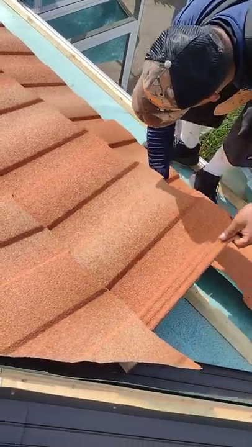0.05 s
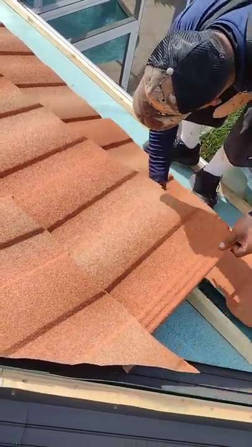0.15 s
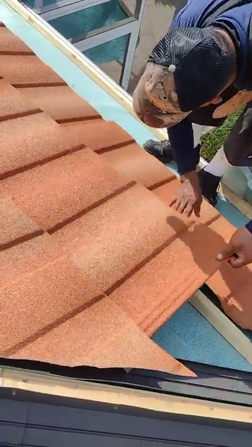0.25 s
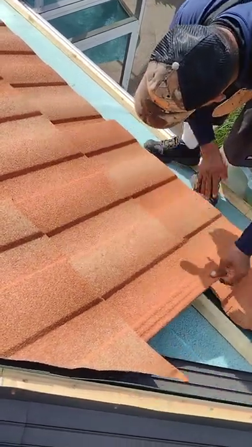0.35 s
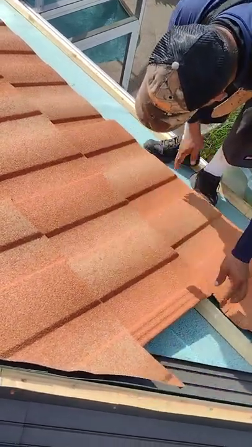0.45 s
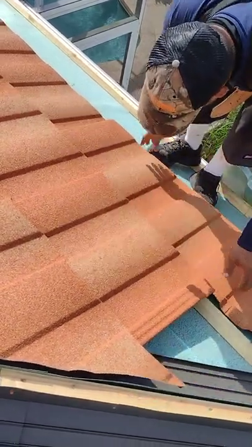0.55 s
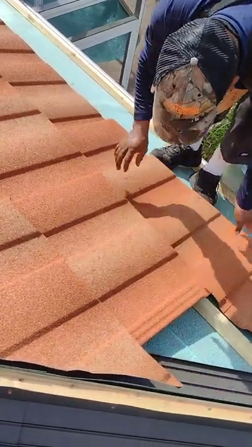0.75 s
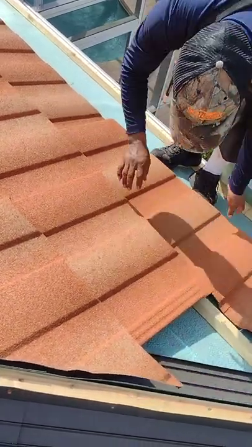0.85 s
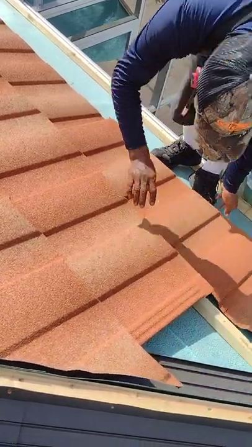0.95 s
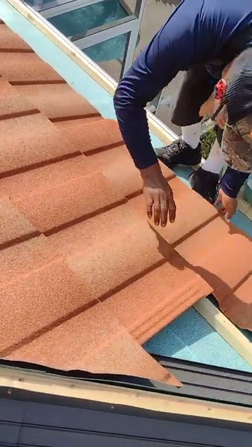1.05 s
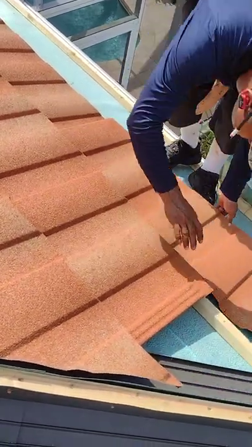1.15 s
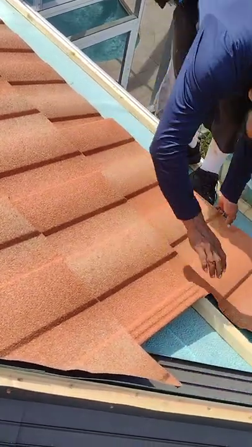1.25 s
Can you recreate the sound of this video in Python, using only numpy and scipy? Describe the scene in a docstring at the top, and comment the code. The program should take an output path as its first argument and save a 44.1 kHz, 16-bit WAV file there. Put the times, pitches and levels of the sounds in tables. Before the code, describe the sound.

A metal roof panel is shoved over its neighbours, scraping grittily and knocking as the thin sheet flexes. It drops flat with a heavy slap, rocks briefly and settles, heard close by outdoors.

```python
"""Outdoors on a roof, close by, a stone-coated steel panel is shoved over its neighbours and dropped flat.
The thin sheet booms as it bends and knocks as it judders along. Its gritty face scrapes, and its edge
snaps over the stone granules and squeaks where it catches. It lands with a heavy slap, rocks a few
times and settles, leaving a faint outdoor background."""
import sys
import numpy as np
from scipy import signal
from scipy.fft import rfft, irfft
from scipy.io import wavfile

SR = 44100
rng = np.random.default_rng(int(sys.argv[2]) if len(sys.argv) > 2 else 0)


def transcribe(u):
    """Save the signal u as a 16-bit wav file named by the first command-line argument.

    u: samples, shape (n,) or (channels, n), limited to [-1, 1]; the rate is SR.
    q: integer samples, one column per channel.
    """
    v = np.clip(np.atleast_2d(u).T, -1, 1)
    q = np.round(v * 32767).astype(np.int16)
    wavfile.write(sys.argv[1], SR, q)


N = 57330  # 1.3 seconds


def amp(db):
    """Turns decibels into a number to multiply a sound by."""
    return 10 ** (np.asarray(db) / 20)


def unit(x):
    """Scales a sound so that its average power is 1."""
    return x / np.sqrt(np.mean(x ** 2) + 1e-20)


def fade(t, fade_s):
    """A curve that dies away by 60 dB every fade_s seconds."""
    return np.exp(-np.log(1000) * t / fade_s)


def read(points, hz):
    """Looks up a value between the rows of a table, with pitch spaced in octaves."""
    pitches, values = np.transpose(points)
    return np.interp(np.log(hz + 1), np.log(pitches + 1), values)


def add(mix, start_s, sound):
    """Mixes a stereo sound in at its start time."""
    part = mix[:, max(round(start_s * SR), 0):][:, :sound.shape[1]]
    part += sound[:, :part.shape[1]]


def sides(hz):
    """How strongly each pitch reaches the left and the right."""
    # Which way each pitch leans: pitch_hz, left_minus_right_db
    balance = [(100, -0.5), (330, -1), (600, -5.5), (1000, 7.5), (1500, 2), (2200, 1), (3200, -4),
               (5000, 3), (12000, 3.5)]
    return amp(np.array([[.5], [-.5]]) * read(balance, hz))


def noise(colour, size):
    """Stereo noise, alike on both sides in the bass, wide in the treble; colour gives level by pitch."""
    # How alike left and right are: pitch_hz, likeness (1 = the same)
    likeness = [(100, 0.78), (250, 1), (500, 0.72), (1000, 0.13), (1800, 0.065), (16000, 0.16)]
    hz = np.fft.rfftfreq(size, 1 / SR)
    a, b = np.exp(2j * np.pi * rng.random((2, len(hz))))
    same = np.clip(read(likeness, hz), -1, 1)
    mid, side = np.sqrt(1 + same) * a, np.sqrt(1 - same) * b
    spectrum = np.array([mid + side, mid - side]) * sides(hz) * amp(read(colour, hz))
    return unit(irfft(spectrum, size))


def flexes():
    """The thin sheet bends, booming or groaning on one note that swells, sags a little and fades."""
    # Bends of the sheet: start_s, length_s, level_db, pitch_hz
    bends = [(0, 0.087, -35, 83), (0.038, 0.11, -37.5, 128.6), (0.092, 0.11, -37.5, 98.3),
             (0.156, 0.064, -30.5, 93.6), (0.219, 0.13, -20.5, 100.9), (0.286, 0.17, -22.5, 321.2),
             (.256, .024, -22, 191), (0.334, 0.15, -23, 91.8), (0.415, 0.11, -27.5, 456),
             (.225, 0.054, -21.5, 141), (0.447, 0.14, -25, 96.5), (0.564, .038, -12.5, 119.4),
             (0.6, 0.12, -30.5, 105.5), (0.622, 0.026, -21.5, 409), (.696, 0.092, -26.5, 112.7),
             (0.78, 0.038, -35, 95), (0.85, 0.071, -41, 111.6)]
    sag, overtone_db = 0.046, -24  # sag is a share of the pitch
    out = np.zeros((2, N))
    for start_s, length_s, level_db, pitch_hz in bends:
        progress = np.arange(0, length_s, 1 / SR) / length_s
        phase = 2 * np.pi * np.cumsum(pitch_hz * (1 + sag * (.5 - progress))) / SR
        note = np.sin(phase) + amp(overtone_db) * np.sin(2 * phase)
        swell = np.sin(np.pi * progress ** 0.4) ** 2  # quick rise, slow fall
        add(out, start_s, sides(pitch_hz) * amp(level_db + 2.5) * swell * note)
    return out


def grains(colour, per_s, fade_s):
    """Granules catch and slip at random, each ringing one of three patches of the sheet."""
    patches, spread_db, rise_s = 3, 5.5, 0.00026
    t, out = np.arange(4096) / SR, np.zeros((2, N))
    for _ in range(patches):
        slips = (rng.random(N) < per_s / patches / SR) * rng.choice([-1, 1], N)
        slips = slips * amp(spread_db * np.minimum(rng.exponential(1, N), 3))
        ring = noise(colour, len(t)) * (1 - np.exp(-t / rise_s)) * fade(t, fade_s)
        out += signal.oaconvolve(slips[None], ring, axes=1)[:, :N]
    return unit(out)


def scrape():
    """The gritty face of the panel drags while its edge slides on the granules with a thin rasp."""
    # How hard the face drags: time_s, level_db
    drag_levels = [(0, -44), (.09, -44.5), (0.124, -37), (.165, -33.5), (.184, -57.5), (.207, -24.5),
                   (0.241, -23.5), (0.256, -32), (.32, -25), (.38, -28.5), (.4, -36), (0.442, -26),
                   (0.479, -35.5), (0.528, -35), (.59, -38), (0.662, -53), (.73, -44), (.9, -61)]
    # Tone of the dragging face: pitch_hz, level_db
    drag_colour = [(60, -22.5), (110, 10.5), (330, 16.5), (580, 10), (800, 15.5), (1050, 5.5), (1600, 3.5),
                   (2800, 1.5), (3600, -11.5), (7000, -21), (12000, -37)]
    # How loud the edge rasps: time_s, level_db
    rasp_levels = [(0, -45.5), (.09, -72), (.13, -41), (.165, -51), (.185, -75), (.215, -41), (.255, -45),
                   (.33, -46.5), (.4, -44.5), (.53, -38.5), (.543, -57), (.556, -26.5), (.585, -41.5),
                   (.68, -52.5), (.71, -67)]
    # Tone of the rasping edge: pitch_hz, level_db
    rasp_colour = [(50, -29), (1200, 4.5), (2000, -0.5), (2400, 4.5), (2950, 5.5), (3500, -12), (6000, -24),
                   (16000, -60)]
    t = np.arange(N) / SR
    drag_db = np.interp(t, *np.transpose(drag_levels)) - 1.5
    rasp_db = np.interp(t, *np.transpose(rasp_levels))
    drag = grains(drag_colour, per_s=1400, fade_s=0.045) * amp(drag_db)
    rasp = grains(rasp_colour, per_s=1800, fade_s=0.07) * amp(rasp_db)
    return drag + rasp


def background():
    """A faint, steady outdoor rumble with a trace of hiss."""
    # Tone of the outdoor air: pitch_hz, level_db
    air_colour = [(25, 2), (50, -0.5), (90, 1.5), (150, -7.5), (230, -6), (400, -19), (650, -55),
                  (1700, -25), (2500, -40.5), (3200, -27.5), (3900, -32.5), (15500, -44.5)]
    return amp(-49.5) * noise(air_colour, N)


def bending_wave(hz, lag_s):
    """A ripple in steel carries treble faster than bass; lag_s is its delay at reference_hz."""
    reference_hz = 401.6
    return np.exp(-4j * np.pi * lag_s * np.sqrt(hz * reference_hz))


def knock(body_db, clash_db, ring_scale):
    """One blow sends a ripple through the sheet and sets off its own notes and a short, noisy clash."""
    # Tone of the ripple: pitch_hz, level_db
    ripple_colour = [(50, -25), (110, 4), (200, 3.5), (400, -8), (1000, 7), (1450, 12.5), (2600, -15),
                     (4000, -26), (9000, -73)]
    # Notes the free sheet rings at: pitch_hz, level_db, fade_s
    sheet_notes = [(134, 0.5, 0.187), (151.8, -2, 0.45), (202.5, -7.5, 0.31), (248.4, -12, 0.34),
                   (309.6, -7.5, 0.21), (354.4, -2, 0.13), (455, -16, 0.36), (490, -24.5, 0.15),
                   (642, -13.5, 0.12), (718, -6, 0.076), (1219, -14.5, 0.33), (1284, -4, 0.12),
                   (2320, -10.5, 0.12), (2577, -8.5, 0.086), (2710, -14, 0.06)]
    # Tone of the clash, many ringing notes packed together: pitch_hz, level_db
    clash_colour = [(40, -62.5), (110, 1.5), (200, 1), (380, 6), (580, -5.5), (800, 3.5), (1020, -9),
                    (1650, 1), (1950, -4.5), (2800, -1), (3500, -22), (6500, -36), (10000, -51.5),
                    (16000, -65)]
    # How long the clash lasts in the free sheet: pitch_hz, fade_s
    clash_fades = [(100, 0.34), (400, 0.12), (1500, 0.055), (3000, 0.053), (10000, 0.018)]
    size, rise_cycles, contact_s = 2 ** 15, 0.22, 0.00077
    t, hz = np.arange(size) / SR, np.fft.rfftfreq(size, 1 / SR)
    # Strength of the blow, from bass boom through body to clash: pitch_hz, level_db
    force = [(119, body_db - 7), (275, body_db), (688, body_db), (1440, clash_db)]

    ripple = amp(read(ripple_colour, hz)) * bending_wave(hz, lag_s=0.00203)
    ripple = ripple / abs(irfft(ripple)).max() * amp(read(force, hz) + 7.5)
    out = irfft(ripple * sides(hz)) * (t < t[-1] / 2)

    for pitch_hz, level_db, fade_s in sheet_notes:
        rise = 1 - np.exp(-t * pitch_hz / rise_cycles)
        note = np.sin(2 * np.pi * pitch_hz * t) * rise * fade(t, fade_s * ring_scale)
        out += sides(pitch_hz) * amp(level_db + read(force, pitch_hz) - 1) * note

    clash = rfft(noise(clash_colour, size)) * amp(read(force, hz) + 0.5)
    for pitch_hz, fade_s in clash_fades:  # each band of pitches dies away at its own speed
        share = [(band_hz, float(band_hz == pitch_hz)) for band_hz, _ in clash_fades]
        band = irfft(clash * read(share, hz))
        rise = 1 - np.exp(-t / (contact_s + rise_cycles / pitch_hz))
        out += 2 * band * rise * fade(t, fade_s * ring_scale)
    return out


def knocks():
    """The panel knocks on the roof as it judders along, lands and rocks to rest."""
    # Blows on the roof: start_s, body_db, clash_db, ring_scale (1 = rings as long as the free sheet)
    blows = [(.001, -35, -46, 0.54), (.034, -33, -39.5, 0.84), (.108, -40, -37.5, 1.1),
             (.134, -32, -33, 0.41), (.152, -30.5, -31.5, 0.4), (.207, -28.5, -31, 1.3),
             (.229, -32.5, -50, 4), (.277, -16.5, -22, 0.81), (.305, -24, -28, 2.9), (.327, -20, -25, 0.77),
             (.344, -22.5, -29, 1.45), (.356, -20.5, -39, 1.33), (.373, -19.5, -27.5, 0.67),
             (.409, -29, -27, 0.4), (.42, -25, -28, 0.87), (.439, -22, -67, 0.93), (.457, -30.5, -32, 0.53),
             (0.495, -25.5, -33.5, .96), (0.526, -24, -29, 0.36), (0.549, -22.5, -29, 0.65),
             (.559, -20.5, -26.5, 0.75), (.57, -10.5, -62, 0.66), (.6, -20.5, -31.5, 0.38),
             (.624, -27, -35, 0.88), (.674, -30, -47, 1.22), (.744, -36, -48, 1.1),
             (.791, -52, -44.5, 0.57), (.877, -47, -60.5, 0.87)]
    out = np.zeros((2, N))
    for start_s, body_db, clash_db, ring_scale in blows:
        add(out, start_s, knock(body_db, clash_db, ring_scale))
    return out


def snaps():
    """The edge jumps over the granules with short, bright rasps, on the left."""
    # Jumps of the edge: start_s, level_db, low_edge_hz (the sound thins out below this pitch)
    jumps = [(0.1575, -42.5, 6540), (0.207, -40.5, 5500), (.223, -38, 3960), (0.3148, -29, 5900),
             (0.329, -21, 1210), (.4205, -26.5, 3430), (0.436, -38, 3880), (0.462, -47, 2000),
             (0.483, -40.5, 6040), (0.551, -35, 2490), (0.5714, -38, 5000), (0.611, -42.5, 2800),
             (0.622, -46, 2980)]
    hold_s, treble_db_per_octave, right_db = 0.004, -18, -12
    t, hz, out = np.arange(4096) / SR, np.fft.rfftfreq(4096, 1 / SR), np.zeros((2, N))
    burst = fade(np.maximum(t - hold_s, 0), fade_s=0.045)
    for start_s, level_db, low_edge_hz in jumps:
        treble_cut = amp(treble_db_per_octave * np.log2(1 + hz / low_edge_hz))
        bass_cut = hz ** 2 / (hz ** 2 + low_edge_hz ** 2)
        hiss = rng.standard_normal((2, len(t)))
        rasp = unit(irfft(rfft(hiss) * treble_cut * bass_cut))
        add(out, start_s, rasp * burst * amp(level_db - 2))
    return out * amp([[0], [right_db]])


def squeaks():
    """The edge catches, and a quick run of slips makes one tinny note of the metal sing briefly."""
    # Catches of the edge: start_s, length_s, level_db, pitch_hz
    catches = [(0.22, 0.019, -35, 2163), (0.273, 0.0079, -20.5, 1680), (0.31, 0.027, -36.5, 3400),
               (.42, 0.013, -35, 1345), (0.503, 0.038, -40.5, 2580), (0.547, 0.011, -30, 2390),
               (0.653, .012, -41, 2727)]
    t, out = np.arange(4096) / SR, np.zeros((2, N))
    for start_s, length_s, level_db, pitch_hz in catches:
        slips = rng.standard_normal((2, len(t))) * np.sin(np.pi * np.minimum(t / length_s, 1))
        ring = np.sin(2 * np.pi * pitch_hz * t) * np.sqrt(t) * fade(t, fade_s=0.019)
        squeak = signal.fftconvolve(slips, ring[None], axes=1)
        squeak *= np.sqrt(length_s * SR) / np.linalg.norm(squeak, axis=1, keepdims=True)
        add(out, start_s, sides(pitch_hz) * amp(level_db) * squeak)
    return out


def slaps():
    """The whole sheet hits the roof's support strips and is stilled at once: one ripple, no ringing."""
    # Flat hits: start_s, level_db, centre_hz
    hits = [(0.2772, -21, 380), (.558, -6.5, 230), (.5685, -6, 544), (.571, -10.5, 150)]
    width_octaves = 0.8
    hz, out = np.fft.rfftfreq(8192, 1 / SR), np.zeros((2, N))
    for start_s, level_db, centre_hz in hits:
        octaves_away = np.log2((hz + 1) / centre_hz)
        hump = np.exp(-.5 * (octaves_away / width_octaves) ** 2) / np.sqrt(hz + 1)
        ripple = hump * bending_wave(hz, lag_s=0.003097)
        slap = irfft(ripple * sides(hz))[:, :len(hz)] / abs(irfft(ripple)).max()
        add(out, start_s, amp(level_db) * slap)
    return out


def echo(sound):
    """The roof deck and nearby walls throw back a faint tail of sound."""
    delay_s, level_db = 0.014, -19
    t = np.arange(SR) / SR
    tail = rng.standard_normal((2, SR)) * (t > delay_s) * fade(t, fade_s=0.466)
    tail *= amp(level_db) / np.linalg.norm(tail[0])
    echoes = signal.fftconvolve(sound, tail, axes=1)[:, :N]
    bass = signal.sosfiltfilt(signal.butter(2, 350, fs=SR, output="sos"), echoes)
    return echoes - bass + bass[0]  # both sides share the same bass


def scene():
    """The panel, its echo and the background; above the bass, sound reaches the left microphone first."""
    panel = knocks() + slaps() + flexes() + scrape() + squeaks() + snaps()
    left, right = panel + echo(panel) + background()
    treble_lag_s, bass_edge_hz = 0.00026, 430
    hz = np.fft.rfftfreq(2 * N, 1 / SR)
    lag_s = treble_lag_s * hz ** 2 / (hz ** 2 + bass_edge_hz ** 2)
    late_right = irfft(rfft(right, 2 * N) * np.exp(-2j * np.pi * hz * lag_s))[:N]
    return np.array([left, late_right])


def record(dry):
    """The microphone drops the deep bass; then the very highest treble is cut off."""
    low_cut_hz, high_cut_hz = 62.6, 15800
    thinned = signal.sosfilt(signal.butter(3, low_cut_hz, "high", fs=SR, output="sos"), dry)
    treble_cut = signal.firwin(511, high_cut_hz, window=("kaiser", 9), fs=SR)
    return signal.oaconvolve(thinned, treble_cut[None], "same")


dry = scene()
out = record(dry)
transcribe(out)
```